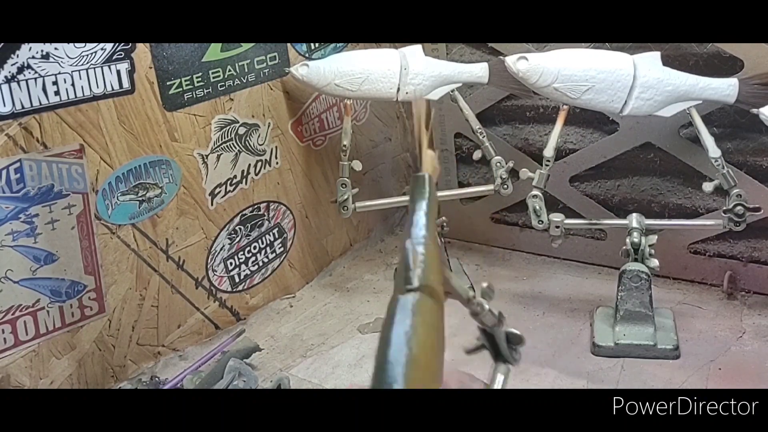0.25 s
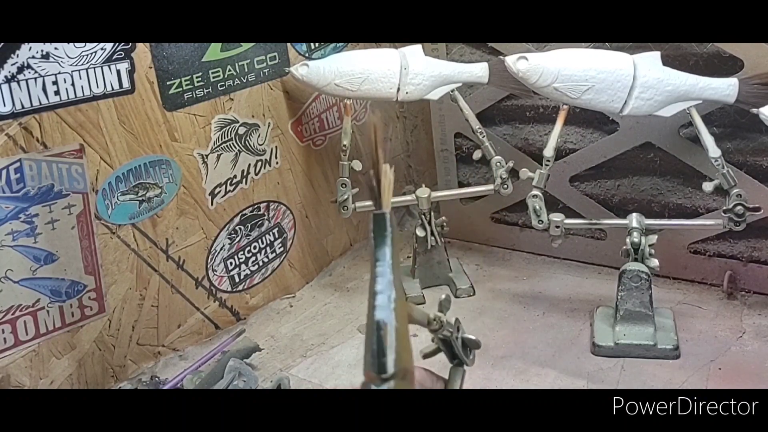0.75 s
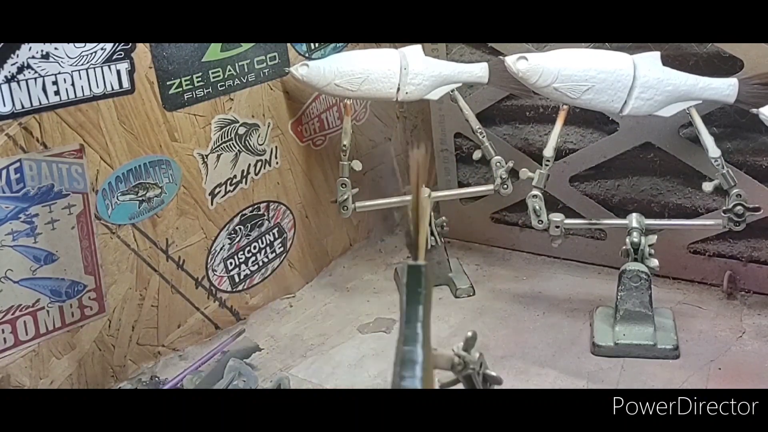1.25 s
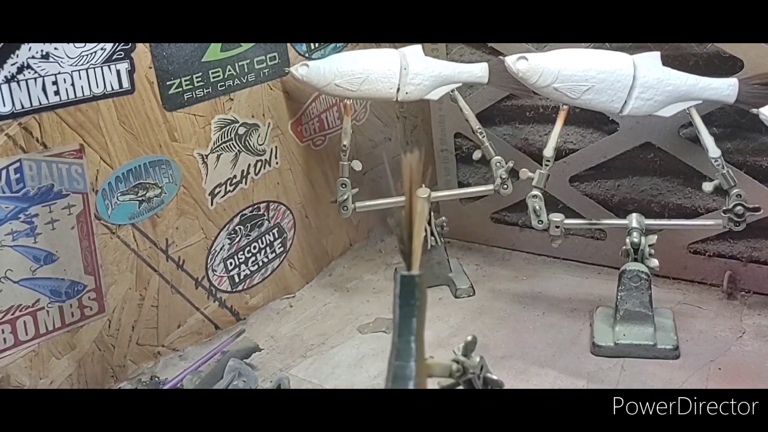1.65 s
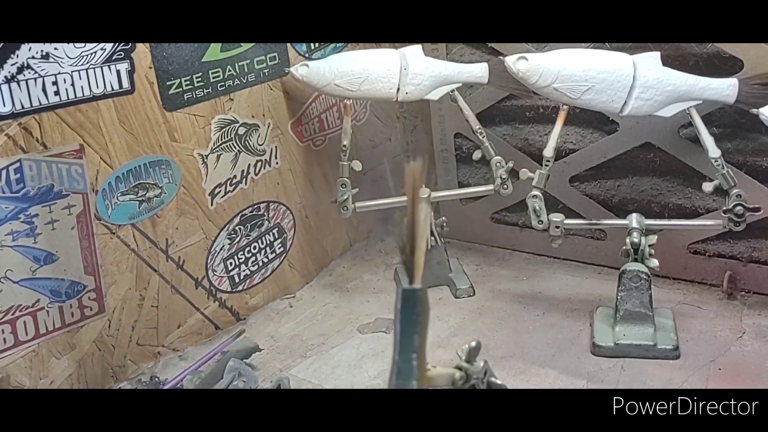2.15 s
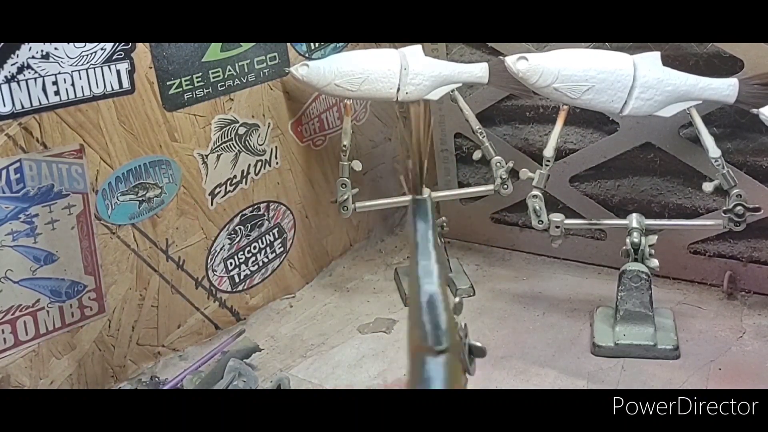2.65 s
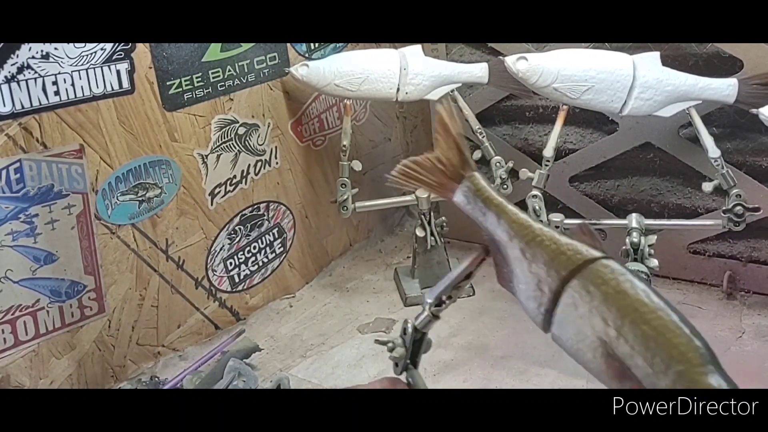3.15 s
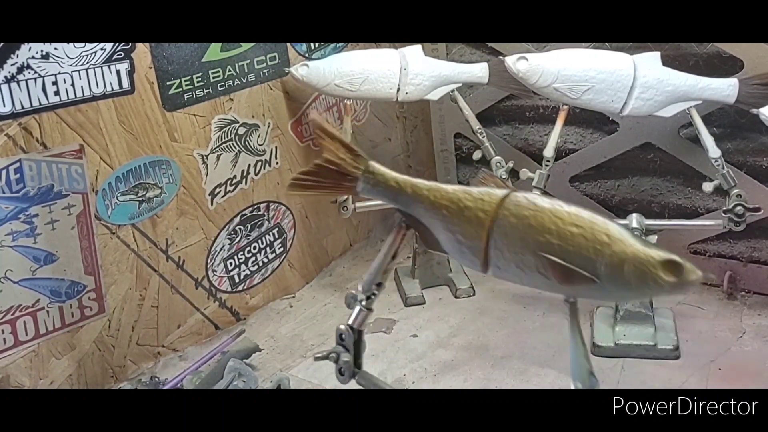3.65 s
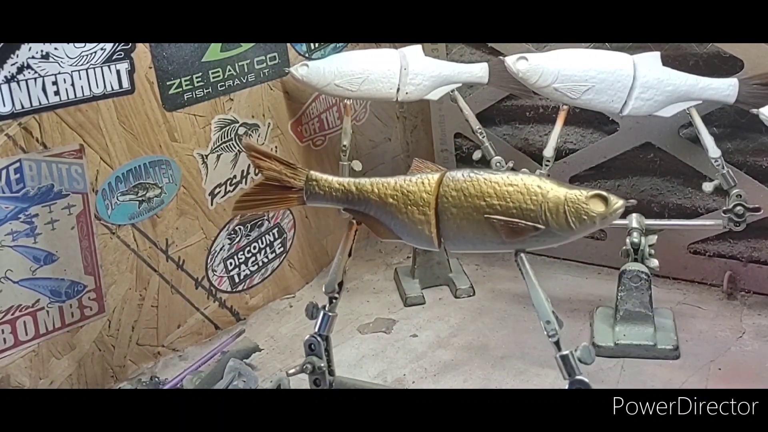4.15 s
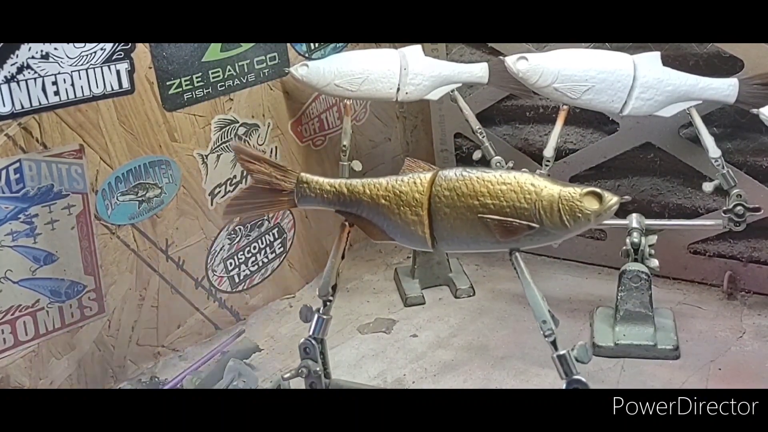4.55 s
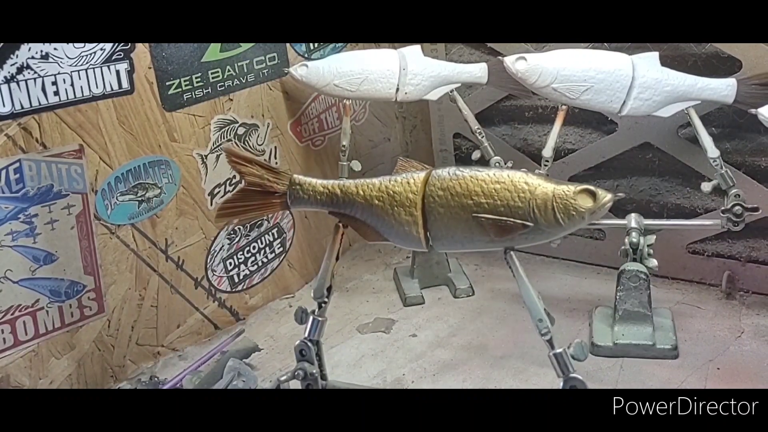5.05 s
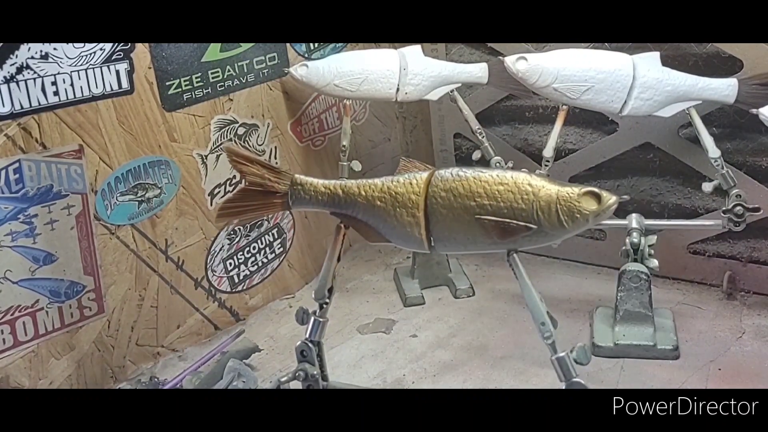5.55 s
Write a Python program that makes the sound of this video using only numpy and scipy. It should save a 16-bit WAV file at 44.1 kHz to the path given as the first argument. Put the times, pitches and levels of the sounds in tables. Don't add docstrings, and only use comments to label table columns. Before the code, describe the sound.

A quiet shed with soft outdoor wash and a faint steady motor hum, heard by a close two-channel phone. From 0 to 0.9 s a clamp stand is handled: low bench booms, rubbing, and bright loose metal clinks, strongest near 0.35 s, with a fly buzzing faintly at the start and again around 0.7 s. An airbrush hisses at 1.16-1.51 s and 2.04-2.23 s, bright and left-leaning, each ending with heavy, low buffeting in the left channel and a sharp, briefly ringing trigger snap. From 2.8 to 4.4 s an outdoor bird gives eleven rapid, raspy whistled scolds with a short reverberant tail, while the stand thumps near 3.14 s and rattles around 3.7-4.0 s. Two more sprays come at 4.59-4.90 s and 5.23-5.54 s, the third ending in a soft click, the last in a crisp snap at 5.6 s, then near quiet with a very faint fly.

```python
import sys
import numpy as np
from scipy import signal
from scipy.fft import rfft, irfft
from scipy.io import wavfile
from scipy.ndimage import uniform_filter1d, map_coordinates

SR = 44100
rng = np.random.default_rng(int(sys.argv[2]) if len(sys.argv) > 2 else 0)


def volts(x):
    e = np.asarray(x, float) / 20
    return 10 ** e


def master(y):
    cut = np.clip(np.atleast_2d(y).T, -1, 1)
    pcm = np.round(cut * 32767)
    wavfile.write(sys.argv[1], SR, pcm.astype(np.int16))


N = 255780
T = np.arange(N) / SR
EARS = np.array([[.5], [-.5]])


def level(x, db):
    return x * volts(db) / np.sqrt(np.mean(x ** 2))


def on_hz(table, size):
    hz, value = np.transpose(table)
    return np.interp(np.log(np.arange(size // 2 + 1) * SR / size + 1), np.log(hz), value)


def colour(x, table):
    size = x.shape[-1]
    return irfft(rfft(x) * volts(on_hz(table, size)), size)


def band(x, lo_hz, hi_hz, order=2):
    return signal.sosfilt(signal.butter(order, [lo_hz, hi_hz], "band", fs=SR, output="sos"), x)


def pair(alike, lag=0):
    left, other = rfft(rng.standard_normal((2, N)))
    shared = np.clip(on_hz(alike, N), 0, 1)
    right = irfft(shared * left + np.sqrt(1 - shared ** 2) * other, N)
    return np.array([irfft(left, N), np.roll(right, lag)])


def walk(rate):
    hold = int(SR / rate)
    steps = np.repeat(rng.standard_normal(N // hold + 1), hold)
    return 1.6 * uniform_filter1d(uniform_filter1d(steps, hold), hold)[:N]


def echo(x, t60, db):
    t = T[:SR // 2]
    tail = rng.standard_normal((2, len(t))) * volts(-60 * t / t60) * (t > .004)
    tail = tail * volts(db) / np.sqrt(np.sum(tail ** 2) / 2)
    return signal.fftconvolve(np.atleast_2d(x), tail, axes=1)[:, :N]


def as_mid(pan_db):
    gain = volts(pan_db * EARS)
    return gain * 2 / np.sqrt(np.sum(gain ** 2, axis=0))


def add(out, s, sound, db, pan_db):
    i = int(s * SR)
    out[:, i:i + sound.shape[-1]] += sound * volts(db) * as_mid(pan_db)


def swell(s, db, rise, fall):
    gain, a, b = np.zeros(N), max(int((s - 1.5 * rise) * SR), 0), int((s + 1.5 * fall) * SR)
    t = T[a:b]
    gain[a:b] = volts(db - 60 * np.maximum((s - t) / rise, (t - s) / fall))
    return gain


# frequency in Hz, level in dB per Hz.
SHED_SPECTRUM = [(24, -53.5), (40, -18), (108, -6.5), (145, -19), (284, -21.5), (554, -21.5), (597, -19.5),
                 (659, -29.5), (845, -21.5), (1420, -28.5), (1920, -26), (2640, -29.5), (3650, -28),
                 (4560, -29.5), (15000, -44)]
# frequency in Hz, likeness from 0 to 1.
DIFFUSE_LIKENESS = [(100, .95), (600, .6), (2000, 0.4), (6000, 0)]
SHED_DB, PORT_LAG = -58.5, 14


def shed():
    wash = level(colour(pair(DIFFUSE_LIKENESS, lag=PORT_LAG), SHED_SPECTRUM), SHED_DB + .5)
    bass = colour(wash, [(200, 5.0), (400, -33)])
    return bass * volts(1.0 * walk(19)) + (wash - bass) * volts(1.3 * walk(4.19))


# frequency in Hz, level in dB, left minus right in dB, phase by which left leads in radians.
MOTOR_LINES = [(353.3, -70, -8, 2.7), (589, -79, 4, 0), (707, -77, 4, 2.4), (1001, -77, -3, 2.4),
               (1534, -84, 6, 1), (1890, -81, -4, 1), (3750, -84, 0, 0), (10907, -88, 0, 0)]


def motor_hum():
    out, drift = np.zeros((2, N)), walk(5)
    for k, (hz, db, pan_db, lead) in enumerate(MOTOR_LINES):
        gain = volts(db + 3 * np.roll(drift, k * SR)) * volts(pan_db * EARS)
        out += gain * np.sin(2 * np.pi * hz * T + lead * EARS)
    return out


# start in seconds, end in seconds, first wing rate in Hz, last wing rate in Hz, level in dB.
FLY_PASSES = [
    (0, .27, 296.3, 292, -54.5),
    (0.659, .9, 304, 293.6, -61),
    (4.36, 4.705, 222, 216.3, -70),
    (5.63, 5.805, 205.4, 203, -63),
]
# frequency in Hz, level in dB.
FLY_SPECTRUM = [(500, -18), (860, 0), (1050, -14), (1200, -16), (1450, -9), (1700, -14), (2200, -30)]
FLY_FADE_DB = -3


def fly():
    out, unsteady = np.zeros(N), 1 + .011 * walk(60)
    flutter_db = 2 * walk(12) + 2.5 * walk(70)
    for start, end, first_hz, last_hz, db in FLY_PASSES:
        part = slice(max(int((start - .05) * SR), 0), int((end + .02) * SR))
        t = T[part]
        wing_hz = np.interp(t, (start, end), (first_hz, last_hz)) * unsteady[part]
        phase = 2 * np.pi * np.cumsum(wing_hz) / SR
        near = np.clip(np.minimum(t - start + 0.049, end - t + 0.012) / 0.018, 0, 1)
        fade_db = np.interp(t, (start, end), (0, FLY_FADE_DB))
        harmonics = sum(np.sin(k * phase) for k in range(2, 9))
        out[part] += volts(db + fade_db + flutter_db[part]) * near * harmonics
    return colour(out, FLY_SPECTRUM)


# start in seconds, peak in dB, opening pitch in Hz, length in seconds.
SCOLDS = [(2.836, -34, 4940, 0.097), (2.985, -33.5, 4830, 0.086), (3.1223, -33, 4714, 0.1),
          (3.255, -33, 4500, 0.094), (3.38, -33, 4500, 0.095), (3.524, -31.5, 4494, 0.09),
          (3.672, -32, 4420, 0.099), (3.822, -30.5, 4467, 0.092), (3.9707, -34, 4485, 0.099),
          (4.1263, -37.5, 4414, 0.12), (4.2897, -33, 4487, 0.095)]
# frequency in Hz, level in dB.
BEAK_SPECTRUM = [(2300, -30), (2750, -6), (3500, -3), (4600, 0), (5400, -10), (6300, -11), (7400, -2),
                 (9000, -13), (11500, -10), (15000, -12)]
HAZE_DB, RIDGE_DB, LOW_VOICE_DB, SWEEP_DB = -4, -7, -17, -5
HAZE_LO_HZ, HAZE_HI_HZ, LOW_VOICE_HZ = 4700, 8380, 3150
SWEEP_FALL, NOTE_RISE = .55, .05


def bird():
    out, t = np.zeros(N), T[:SR // 6]
    flail, pulsing = .5 + .5 * np.tanh(.8 * walk(1300) - .3), walk(560)
    haze = level(band(rng.standard_normal(N), HAZE_LO_HZ, HAZE_HI_HZ), HAZE_DB)
    for s, db, hz, length in SCOLDS:
        first = int((s - .015) * SR)
        part = slice(first, first + len(t))
        u = t / length
        rasp = np.clip((u - .17) / .5, 0, 1)
        phase = 2 * np.pi * np.cumsum(hz * (1.01 - .04 * u - .4 * rasp * flail[part])) / SR
        rise = np.clip((u - .08) / NOTE_RISE, .15 * u / .08, 1)
        envelope = rise * np.clip((1.2 - u) / 0.8, 0, 1) ** 1.1
        ridge = volts(RIDGE_DB) * rasp * np.sin(2 * np.pi * hz * t)
        low_voice = volts(LOW_VOICE_DB) * (1 - rasp) * np.sin(2 * np.pi * LOW_VOICE_HZ * t)
        glide = np.cumsum(1 - SWEEP_FALL * np.clip(u - .17, 0, 1)) / SR
        sweep = volts(SWEEP_DB) * np.clip(1.9 - 2.6 * u, 0, 1) * np.sin(2 * np.pi * hz * glide + 1)
        overtones = volts(-10) * np.sin(2 * phase) + volts(-16.5) * rasp * np.sin(3 * phase)
        overtones += volts(-35) * rasp * np.sin(4 * phase)
        voice = np.sin(phase) + ridge + low_voice + sweep + overtones + rasp * haze[part]
        out[part] += volts(db - 6.5 + 2 * pulsing[part]) * envelope * voice
    out = colour(out, BEAK_SPECTRUM)
    return volts(-4.5) * out + echo(out, 0.066, -0.13) + echo(out, 0.43, -4.5)


# peak time in seconds, peak in dB, pitch in Hz, 60 dB rise in seconds, 60 dB fall in seconds.
BENCH_BOOMS = [(.035, -33, 121, .3, .3), (.085, -31, 121, .25, .35), (.165, -36, 121, .1, .25),
               (.215, -37, 121, .12, .15), (.298, -32, 115, .06, .2), (.345, -42, 128, .2, .25),
               (.405, -41, 137, .2, .15), (.595, -49, 120, .3, .5), (.797, -37, 102, .04, .3),
               (.835, -42, 215, .2, .4), (.94, -48, 92, .2, .3), (3.3, -50, 62, .2, .25),
               (3.48, -49, 75, .1, .2)]


def booms():
    wobble = np.cumsum(1 + .08 * walk(60)) / SR
    return sum(swell(s, db, rise, fall) * np.sin(2 * np.pi * hz * wobble)
               for s, db, hz, rise, fall in BENCH_BOOMS)


# time in seconds, peak in dB, t60 in seconds, upper rumble re level in dB.
STAND_KNOCKS = [(.015, -40, 0.6, -2), (.075, -44, .8, -5), (.16, -48, 0.6, -6), (.296, -45, 0.62, -6),
                (.59, -58.5, .8, -14), (.73, -55.5, .2, -17), (.794, -46, .9, 0), (.85, -58, 1.1, -2),
                (1.3, -59, 1.2, -3.5), (1.56, -50, 0.28, -8.5), (1.66, -59, 3.0, -9.5),
                (2.3, -55.5, 2.7, -9.5), (3.134, -34, .11, -18), (3.21, -53.5, 1.3, -18),
                (3.474, -52.5, 0.18, -23), (3.66, -60.5, 1.5, -14), (3.79, -48.5, 0.75, -14.5),
                (3.975, -56, 0.42, -22), (4.84, -60, .7, -5), (5.24, -59, 1.1, 0.1)]
# time in seconds, peak in dB, 60 dB rise in seconds,
# 60 dB fall in seconds, upper rumble re level in dB.
DRAUGHT_GUSTS = [(1.46, -54, .5, .2, -13), (1.51, -37.5, 0.26, 0.2, -3), (1.55, -35, 0.25, 0.06, -5),
                 (2.075, -48.5, 0, .5, -16.5), (2.14, -49, 0.33, 0.5, -13), (2.2, -42, 0.32, .2, -18),
                 (2.232, -33.5, 0.03, 0.11, -6), (2.248, -31, 0.03, 0.05, 3), (2.278, -34, 0.03, 0.12, -5),
                 (4.7, -61.5, 0.5, 0.5, -7.5), (4.82, -50, .5, 0.43, -5.5), (4.895, -51, .3, 0.02, -1),
                 (5.238, -49.5, 0.15, 0.03, -20), (5.328, -55, .3, 0.2, -2.5),
                 (5.43, -55.5, 0.1, 0.67, -1.5)]
# frequency in Hz, level in dB per Hz.
RUMBLE_SPECTRUM = [(30, -28), (70, -10), (95, -7), (117, 1), (150, -10), (290, -9), (800, -27), (1500, -45)]
KNOCK_RISE_S = 0.02
KNOCK_SIDE_DB = -8


def rumble():
    eddies = colour(rng.standard_normal((2, N)), RUMBLE_SPECTRUM)
    deep = colour(eddies, [(230, 1), (300, -48)])
    deep, upper = level(deep, -0.1), level(eddies - deep, -0.1)
    knocks = booms()
    for s, db, t60, upper_db in STAND_KNOCKS:
        knocks += swell(s, db, KNOCK_RISE_S, t60) * (deep[0] + volts(upper_db) * upper[0])
    draught = np.zeros(N)
    with np.errstate(all="ignore"):
        for s, db, rise, fall, upper_db in DRAUGHT_GUSTS:
            draught += swell(s, db, rise, fall) * (deep[1] + volts(upper_db) * upper[1])
    side = volts(KNOCK_SIDE_DB) * np.imag(signal.hilbert(knocks))
    return np.array([knocks + side + 2 * draught, knocks - side]) * volts(2 * walk(30))


# time in seconds, peak in dB, 60 dB rise in seconds,
# 60 dB fall in seconds, treble lift in dB.
HAND_RUBS = [(.03, -57, .3, 0.6, -17), (.28, -59, 1.6, -0.05, -3), (0.345, -42, .12, 0.2, 8),
             (.13, -65, 1, 1, -20), (.23, -63, 1, 1, -20), (.38, -63, .1, 1.3, 3),
             (2.33, -62, 0.8, 0.5, -13.5), (.81, -59.5, .1, 0.2, -4), (1.074, -67, .03, -0.7, 7),
             (3.3, -71, 1, .8, 6), (3.498, -66, 0.6, 1, 10), (3.57, -63, 0.5, .6, 10),
             (3.69, -55.5, .06, -0.4, 9), (3.786, -49, 0.13, 0.55, 6), (3.975, -62, 0.14, .5, 9),
             (4.015, -61, 0.5, 0.3, 11.5), (4.33, -70, 0.6, 1, 9), (5.62, -66, 1.5, 1.5, -15)]
# frequency in Hz, level in dB per Hz.
RUB_SPECTRUM = [(590, -44.5), (1000, -10.5), (1450, -5), (2230, -6), (2710, 0.5), (4620, -13.5),
                (11300, -11.5), (16000, -20.5)]


def rustle():
    grain = level(colour(pair(DIFFUSE_LIKENESS), RUB_SPECTRUM), 1.8)
    dull = colour(grain, [(4200, 1.5), (5500, -40.5)])
    rub = sum(swell(s, db, rise, fall) * (dull + volts(treble_db) * (grain - dull))
              for s, db, rise, fall, treble_db in HAND_RUBS)
    return rub * volts(2.2 * walk(90))


# time in seconds,
# peak in dB, swing in Hz, length in seconds, share at the right port from 0 to 1.
PORT_SLAPS = [(1.4985, -19.5, 170, .003, 0.04), (1.5142, -13, 100, 0.0046, 0.01),
              (1.5235, -14, 151, 0.0051, 0), (1.5335, -18.5, 109.3, .005, 0.01),
              (1.5435, -18.5, 110.1, .004, 0.02), (1.554, -20.5, 170, .003, 0.02),
              (2.232, -10.5, 170, .004, 0), (2.238, -11.5, 110, .004, 0), (2.2483, -4, 110.1, .0035, 0),
              (2.259, -13.5, 65, .008, 0), (2.2735, -17, 200, .003, 0), (2.2445, -19, 300, .0012, 0),
              (2.2478, -18, 520, .0012, 0), (2.2975, -25, 100, .005, 0), (2.282, -25, 120, .003, 0),
              (3.137, -28.5, 95, 0.01, 0.87)]


def slaps():
    out, t = np.zeros((2, N)), T[:4096] - T[2048]
    for s, db, hz, length, right in PORT_SLAPS:
        i = int(s * SR) - 2048
        dip = volts(db) * np.cos(2 * np.pi * hz * t) * np.exp(-(t / length) ** 2)
        out[:, i:i + len(t)] -= np.outer((1, right), dip)
    return out


# time in seconds, peak in dB, dull part re peak in dB, left minus right in dB.
CLINKS = [(0.0253, -50, 0, -4), (.037, -45, 2, 0), (.2799, -47, -12, 0), (.3153, -36, -14, 0),
          (.427, -40, -14, 0), (0.196, -51.5, 5, 3), (.2906, -46, -4, -6), (.3073, -35, -5, 0),
          (0.3294, -18, -10, -3.5), (.339, -25, -8, -3.5), (0.3489, -16, -12, -4.5), (0.355, -24, -20, 0),
          (.417, -30.5, -11.5, -2), (0.4437, -39.5, -0.5, 2.5), (0.4617, -38, -4, 5), (.474, -30, -10, -3),
          (0.4888, -44, -1, 4), (0.5621, -38.5, -10, -3), (.7447, -49.5, -11.5, -2), (.7864, -52.5, 1, 0),
          (1.072, -52.5, -26, 0), (2.8377, -41, -10, -3), (2.9273, -41.5, -7, -2), (3.1408, -37, -8, -2),
          (3.2527, -45, -4, 5), (3.265, -44, -9, 1), (3.4885, -37, -6, 0), (3.692, -33.5, -15, -5),
          (3.776, -45, 1, 0), (3.7842, -29, -4, -6), (3.791, -29, -8, -3.5), (3.7958, -35, 1, -2),
          (3.8287, -33, -7, -1), (3.8485, -28, -12, -5), (3.8686, -27.5, -14, -2), (3.912, -32, -11, -4),
          (3.9743, -44, -10, -1), (3.9922, -36, -12, -2.5), (4.2296, -34.5, -9, -1)]
# frequency in Hz, level in dB per Hz.
CLINK_SPECTRUM = [(2650, -37.5), (4500, -19), (5040, 0.5), (5530, -13.5), (7140, 3), (9790, -6),
                  (11400, -4), (14600, -11), (16500, -52)]
# frequency in Hz, level in dB, t60 in seconds.
CLAMP_MODES = [(5030, -8, .025), (7080, 0, .04), (8090, -4, .045), (10650, -5, .02)]
CLINK_RISE_S, CLINK_T60_S = 0.0014, 0.066
CLAMP_RING_DB, CLINK_TAIL, KNOCK_TAIL = -7, .6, .45


def rattle():
    out, t = np.zeros((2, N)), T[:SR // 8]
    rise, tick = np.minimum(t / CLINK_RISE_S, 1) ** 2, 4.5 * volts(-60 * t / .01)
    tail = volts(-60 * t / CLINK_T60_S)
    for s, db, dull_db, pan_db in CLINKS:
        noise = rng.standard_normal((3, len(t)))
        noise = 0.32 * noise[0] + 1.4 * noise[1:]
        ring = 0
        for hz, mode_db, t60 in CLAMP_MODES:
            decay = volts(mode_db + 4 * rng.standard_normal() - 60 * t / t60)
            cycles = hz * rng.normal(1, .012) * t + rng.random((2, 1))
            ring = ring + decay * np.sin(2 * np.pi * cycles)
        clink = level(colour(noise, CLINK_SPECTRUM), -0.1) * (tick + CLINK_TAIL * tail)
        knock = level(band(noise, 1600, 5400), dull_db) * (tick + KNOCK_TAIL * tail)
        add(out, s, rise * (clink + knock + volts(CLAMP_RING_DB) * 2 * ring), db - 10.0, pan_db)
    return out


# time in seconds, peak in dB, left minus right in dB.
TRIGGER_SNAPS = [
    (1.5432, -18, -3.5),
    (2.2693, -19, -3),
    (4.9896, -35.5, 2),
    (5.604, -18.5, 4),
]
# frequency in Hz, level in dB, t60 in seconds.
NEEDLE_MODES = [(8190, 0, .16), (8820, -6, .08), (9740, -10, .08), (10600, -8, .08), (11800, -2, .08),
                (12300, -5, .06), (14380, -10, .06)]
# frequency in Hz, level in dB.
SNAP_SPECTRUM = [(1500, -28), (3000, -10), (6000, -8.5), (9000, -1), (12000, 7), (15500, 1.5)]


def trigger():
    out, t = np.zeros((2, N)), T[:SR // 6]
    for s, db, pan_db in TRIGGER_SNAPS:
        noise = rng.standard_normal((2, len(t)))
        crack = level(colour(noise, SNAP_SPECTRUM), 0) * volts(-60 * t / .014)
        wisp = band(noise[:, ::-1], 9000, 14000) * volts(-15 - 60 * t / .14)
        ring = 0
        for hz, mode_db, t60 in NEEDLE_MODES:
            decay = volts(mode_db + 3 * rng.standard_normal((2, 1)) - 60 * t / t60)
            ring = ring + decay * np.sin(2 * np.pi * (hz * t + rng.random((2, 1))))
        add(out, s, crack + wisp + volts(-23) * ring, db - 1.5, pan_db)
    return out


def bench(x, db, count=4):
    out = x.copy()
    for port in range(2):
        for base in rng.uniform(8, 320, count):
            lag = base * (1 + .04 * walk(3))
            out[port] += volts(db) * np.interp(np.arange(N) - lag, np.arange(N), x[port])
    return out


# start in seconds, end in seconds, centre in
# Hz, width in Hz.
NULL_BANDS = [(1.18, 1.42, 1600, 170), (1.4, 1.47, 1740, 150), (1.21, 1.3, 2430, 170),
              (1.18, 1.28, 3420, 190), (1.18, 1.23, 3800, 190), (1.26, 1.36, 3820, 190),
              (1.33, 1.41, 3050, 180), (1.21, 1.29, 4520, 170), (1.19, 1.25, 5420, 300),
              (1.41, 1.56, 3550, 160), (5.3, 5.42, 3900, 300)]


def nulls(x):
    out, size = x.copy(), 16384
    bin_hz = np.arange(size // 2 + 1) * SR / size
    for start, end, hz, width in NULL_BANDS:
        part = slice(int(start * SR), int(start * SR) + size)
        gate = np.clip(np.minimum(T[part] - start, end - T[part]) / .012, 0, 1)
        inside = np.abs(bin_hz - hz) < width / 2
        out[:, part] -= gate * irfft(rfft(x[:, part].mean(axis=0)) * inside, size)
    return out


# trigger pressed in seconds, released in seconds, hiss in dB,
# pressure build-up in seconds, opening lean left minus right in dB.
SPRAY_BURSTS = [
    (1.159, 1.51, -21.5, 0.03, 10),
    (2.04, 2.229, -21.5, .012, 13),
    (4.589, 4.903, -21, 0.026, 17),
    (5.228, 5.537, -22, 0.017, 15.5),
]
VALVE_OPEN_S, VALVE_SHUT_T60_S, BUILD_UP_DB = .006, 0.055, -15.5
LEAN_END_DB, LEAN_SETTLE_S = 6, 0.096
LOW_HISS_START_DB, LOW_HISS_END_DB, LOW_HISS_SHUT_DB, LOW_HISS_GROW_S = -24, -14, -11, 0.086


def valve():
    flow, low_db, pan_db = np.zeros(N), np.zeros(N), np.zeros(N)
    for press, release, db, build, lean_db in SPRAY_BURSTS:
        t, after, now = np.maximum(T - press, 0), np.maximum(T - release, 0), T >= press
        pressure_db = BUILD_UP_DB * np.exp(-t / build) - 60 * after / VALVE_SHUT_T60_S
        flow += np.minimum(t / VALVE_OPEN_S, 1) * volts(db + pressure_db)
        settled = np.interp(after, (0, VALVE_SHUT_T60_S / 2), (LOW_HISS_END_DB, LOW_HISS_SHUT_DB))
        growing = (LOW_HISS_START_DB - LOW_HISS_END_DB) * np.exp(-t / LOW_HISS_GROW_S)
        low_db[now] = (settled + growing)[now]
        pan_db[now] = (LEAN_END_DB + (lean_db - LEAN_END_DB) * np.exp(-t / LEAN_SETTLE_S))[now]
    return flow, low_db, pan_db


# frequency in Hz, level in dB per Hz.
JET_SPECTRUM = [(350, -45), (700, -22.5), (1100, -21), (1500, -19.5), (2100, -18), (2930, -12.5),
                (3790, -10), (7240, -2), (8980, -2.5), (13000, -1.4), (15500, -6.5)]
# frequency in Hz, left minus right in dB.
JET_LEANING = [(60, 13.5), (110, 6), (200, -3), (380, 0.5), (700, -1), (1290, 5), (2380, 5.5), (3700, 3),
               (8120, 0.5), (15000, 9.5)]
# frequency in Hz, likeness from 0 to 1.
JET_LIKENESS = [(300, 0.3), (1600, .97), (2500, .6), (3700, .98), (4600, .8), (5400, .93), (8000, 0.6),
                (14000, 0.4)]
# time in seconds, delay of the right port in samples.
JET_DELAY = [(1.17, 11.6), (1.5, 13.3), (2.05, 14.2), (2.23, 13.6), (4.62, 20), (4.9, 16), (5.25, 15.3),
             (5.33, 16.5), (5.42, 17), (5.54, 20.5)]


def spray():
    flow, low_db, pan_db = valve()
    treble_lean = np.mean(np.array(JET_LEANING)[-3:, 1])
    lean = np.array([(hz, db - treble_lean) for hz, db in JET_LEANING])
    jet = colour(pair(JET_LIKENESS), JET_SPECTRUM)
    heard_at = np.arange(N) - np.interp(T, *np.transpose(JET_DELAY))
    jet[1] = map_coordinates(jet[1], [heard_at], mode="wrap")
    jet = np.array([colour(jet[0], lean * (1, .5)), colour(jet[1], lean * (1, -.5))])
    low = colour(jet, [(4000, -0.5), (5500, -39)])
    high = (jet - low) * volts(.6 * walk(25))
    hiss = level(high, -0.1) + level(low, -0.1) * volts(low_db + 0.84 * walk(22))
    return hiss * flow * volts(-.4 + .6 * walk(150)) * as_mid(pan_db)


def scene():
    background = shed() + motor_hum() + fly() + bird()
    handling = rumble() + rustle() + slaps()
    near = rattle() + trigger() + bench(spray(), -13.5, count=3)
    return background + handling + nulls(near + echo(near, 0.11, -13.0))


def roll_off(x):
    return signal.sosfilt(signal.butter(12, 16830, fs=SR, output="sos"), x)


# frequency in Hz, level in dB.
PHONE_RESPONSE = [(25, -5), (60, 0), (15550, 0), (15750, -42)]


def record(dry):
    mix = colour(dry, PHONE_RESPONSE)
    return roll_off(mix)


dry = scene()
out = record(dry)
master(out)
```